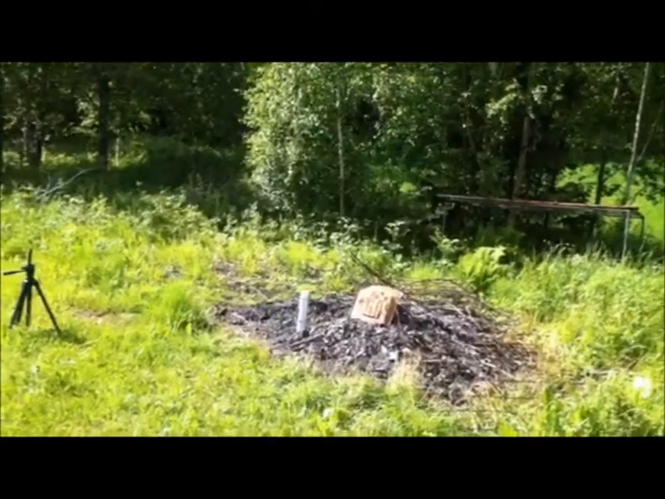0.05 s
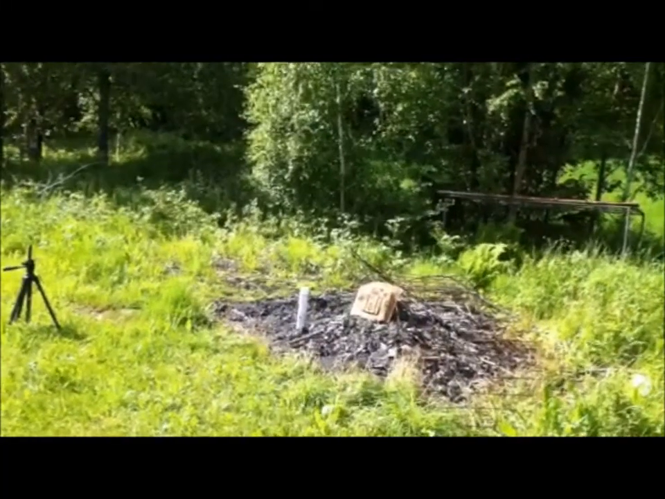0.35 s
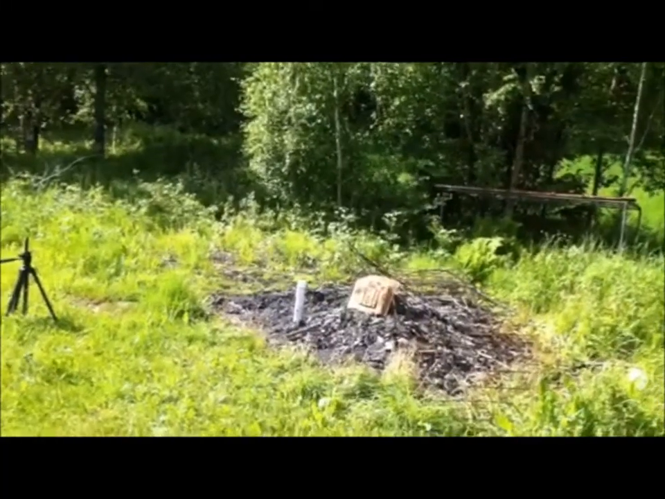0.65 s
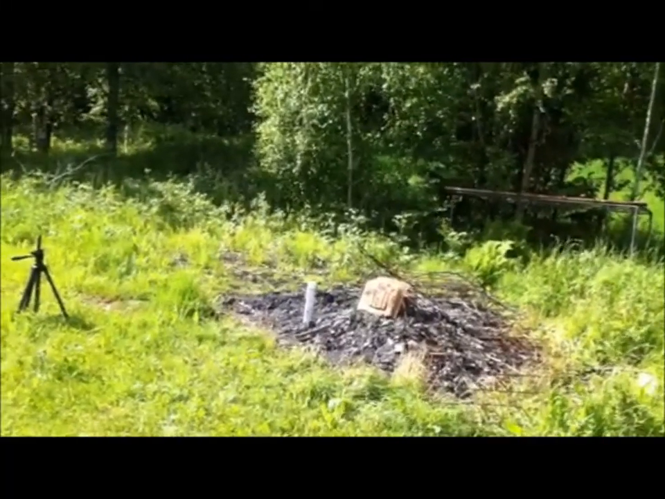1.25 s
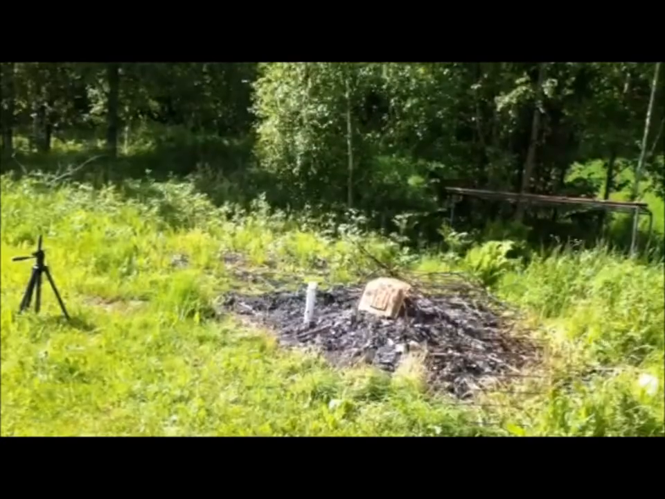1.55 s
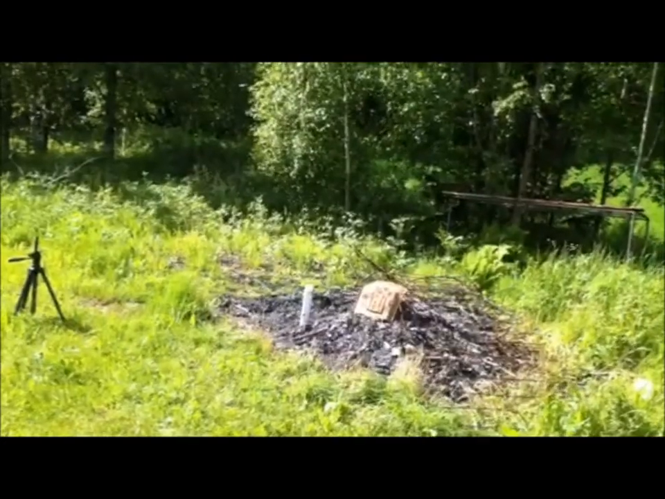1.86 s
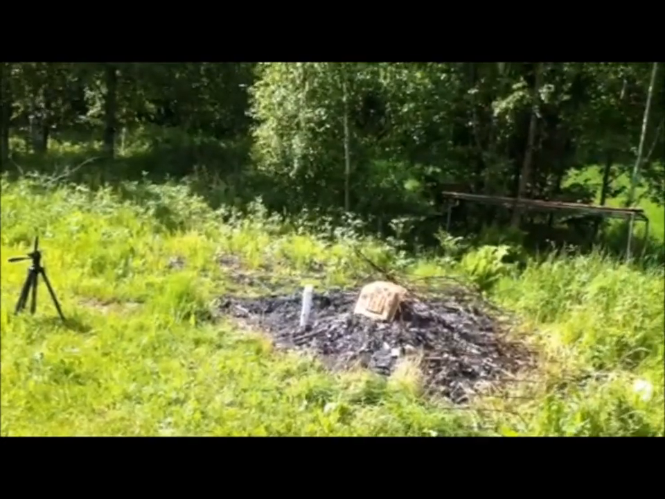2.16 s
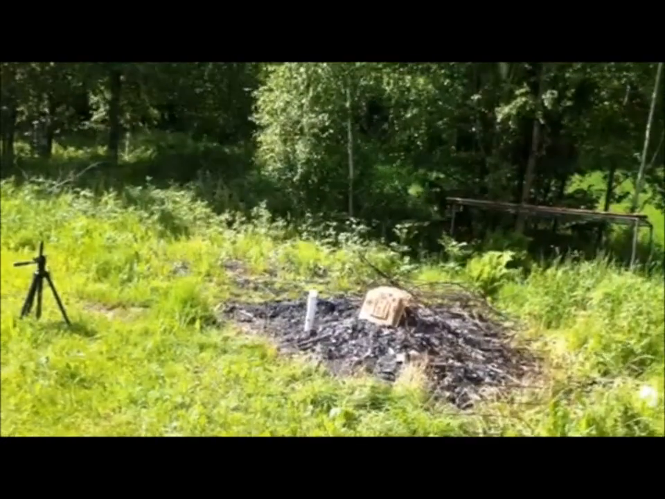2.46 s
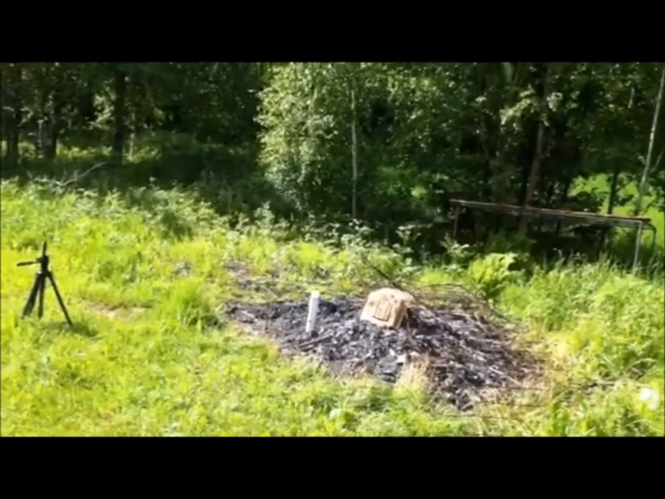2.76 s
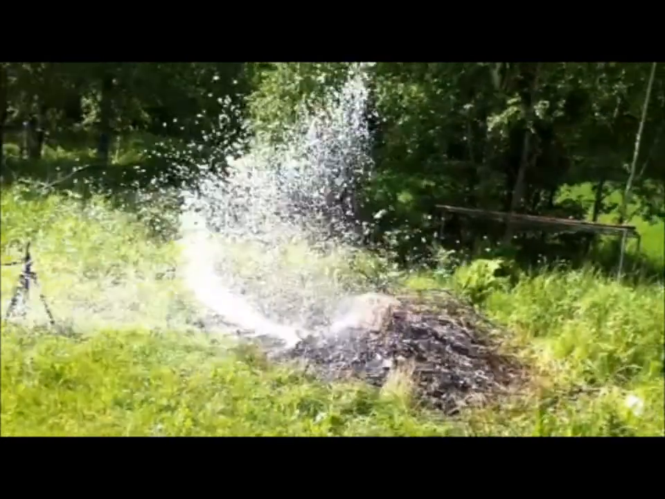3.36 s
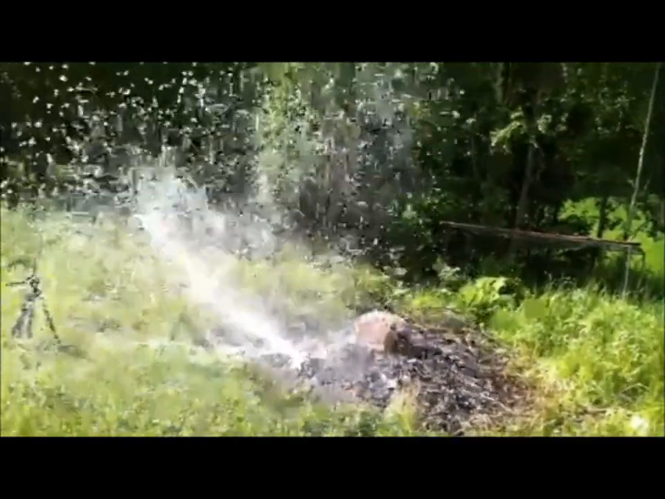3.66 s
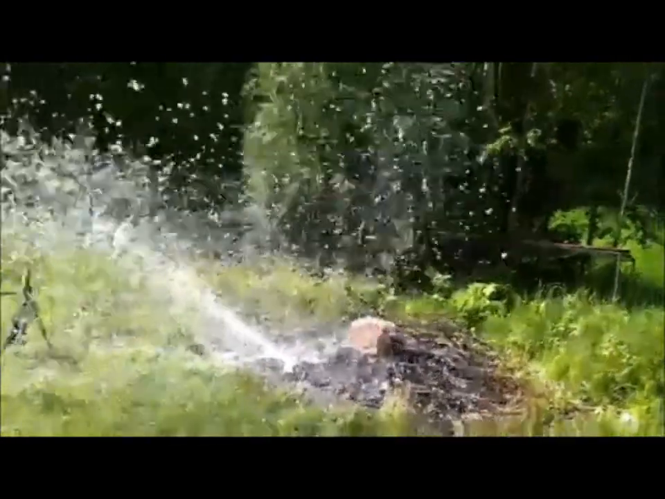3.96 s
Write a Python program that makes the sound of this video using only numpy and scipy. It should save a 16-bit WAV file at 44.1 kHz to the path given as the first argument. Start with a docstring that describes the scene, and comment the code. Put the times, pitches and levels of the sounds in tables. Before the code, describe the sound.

A pressurized can bursts with a sharp bang several metres away in a clearing. Before it, light wind buffets the microphone over faint rustling; after it come a short echo and a surging, hissing jet of spray.

```python
"""A pressurized can bursts on a fire heap in a clearing, several metres away. Its wall tears with
a 40 ms blast and a few sharp cracks, and the trees scatter the bang back. The contents spurt out,
then open into a surging, hissing jet, coloured by its bounce off the ground. Underneath, a breeze
buffets the microphone over a bed of distant rustle, with two brief hollow hoots."""
import sys
import numpy as np
from scipy import signal
from scipy.fft import rfft, irfft
from scipy.io import wavfile
from scipy.ndimage import uniform_filter1d

SR = 44100
rng = np.random.default_rng(int(sys.argv[2]) if len(sys.argv) > 2 else 0)


def waveform_to_disk(signal):
    """Save audio, clipped to [-1, 1], as 16-bit WAV at the path in sys.argv[1]."""
    frames = np.transpose(np.atleast_2d(signal))
    scaled = np.clip(frames, -1, 1) * 32767
    samples = np.round(scaled).astype(np.int16)
    wavfile.write(sys.argv[1], SR, samples)


N = 176400

# surges of gas as the tear runs on (time [s], hold [s], level [dB])
GAS_SURGES = [(3.0608, 0.0027, -18), (3.0705, 0.0071, -17.5), (3.0816, 0.0035, -22), (3.0938, 0.0023, -21)]
# body of the blast (frequency [Hz], level [dB])
BLAST_EQ = [(60, -25), (240, -15), (400, -1.5), (600, 4), (745, -1), (880, 4.5), (1100, 2.5), (1250, -2),
            (1520, -2.5), (1700, -17), (2000, -1.5), (2950, -0.5), (3950, -6), (5200, 0.5), (8300, -7.5),
            (12900, 0), (15500, -8.5)]
# cracks of the tearing wall (time [s], pressure step [dB], wave length [s], rasp level [dB])
WALL_CRACKS = [(3.0712, -2.5, 0.0004, -13), (3.0727, -3.5, 0.00097, -8.5), (3.0736, -4, .0002, -4.5),
               (3.0749, -15, 0.00012, -8), (3.0762, -7, 0.00059, -25), (3.086, -21, 0.00067, -12),
               (3.0946, 0, 0.00017, -10), (3.097, -13, 0.00055, -27)]
# rasp on each crack (frequency [Hz], level [dB])
RASP_EQ = [(300, -19), (900, 6.5), (1700, -26), (2400, 1), (5000, -4), (8500, 0), (13000, 4.5), (15500, -6)]
# short resonances of the split can (frequency [Hz], width [Hz], gain [dB])
CAN_MODES = [(1047, 117, 2.5), (900, 69, -4), (2420, 880, -6)]
# thin first spray (frequency [Hz], level [dB])
SPURT_EQ = [(880, -54), (1500, -8), (1750, -16), (2240, -15), (2830, -15), (3650, -5.5), (7020, -4.5),
            (11900, 1), (15500, -4)]
# surging of the jet, before the trims (time [s], treble [dB], upper mids [dB], lower mids [dB])
JET_LEVELS = [(3.31, -31, -33.5, -40), (3.324, -25, -28, -36.5), (3.37, -28, -29, -40),
              (3.376, -22.5, -25, -36), (3.428, -30.5, -33.5, -43.5), (3.47, -24, -25, -37),
              (3.52, -25, -31, -42), (3.564, -22, -28, -36.5), (3.624, -20.5, -27.5, -38.5),
              (3.692, -29, -30.5, -39), (3.85, -26, -30.5, -40.5), (3.862, -24.5, -28.5, -42.5),
              (3.92, -29, -31, -38), (3.966, -28.5, -28, -41), (4.0, -25, -30.5, -36)]
# edges of those three bands, top down (frequency [Hz])
JET_BAND_EDGES = [16000, 7500, 3300, 100]
# trim on each band, top down (gain [dB])
JET_BAND_TRIMS = [0.67, 0, -0.87]
# hiss within the bands (frequency [Hz], level [dB])
JET_EQ = [(59, -69), (100, -24.5), (259, -13), (413, -19), (459, -11), (731, -15), (1020, -10),
          (1320, -13.5), (1560, -9), (1740, -9), (2830, -9), (4700, 0), (6460, -2.5), (13300, -0.5),
          (15700, -9)]
# cough as the jet opens (frequency [Hz], level [dB])
COUGH_EQ = [(300, -35), (1500, -15), (2600, 2.5), (3600, 3), (4800, 7.5), (6500, -13), (14000, -25)]
# echo tail from the trees (frequency [Hz], level [dB])
ECHO_EQ = [(35, -75), (60, -45), (156, -16.5), (351, 2.5), (464, -8), (642, 0), (2150, -5), (2840, -2.5),
           (4120, -7), (11700, -3), (15500, -10)]
# wind pressure on the microphone (time [s], level [dB])
WIND_PRESSURE = [(0, -53), (.28, -56.5), (.5, -53), (.68, -58), (.75, -61), (.88, -49.5), (1.05, -58),
                 (1.38, -53), (1.47, -42), (1.56, -56), (1.68, -46.5), (1.82, -43), (1.94, -49),
                 (2.07, -42), (2.2, -53.5), (2.36, -55), (2.46, -49), (2.75, -43), (2.89, -51.5),
                 (3.04, -60.5), (4, -64.5)]
# low rumble of the wind (frequency [Hz], level [dB])
WIND_EQ = [(25, -43), (45, -33), (70, -12.5), (100, -4.5), (135, -0.5), (170, -2.5), (240, -9), (330, -18),
           (500, -39), (1200, -63)]
# brighter rasp of hard buffets (frequency [Hz], level [dB])
BUFFET_EQ = [(150, -17), (270, -9), (340, 4), (450, -4), (800, -17), (1500, -20), (5000, -50)]
# single eddies thumping the microphone (time [s], peak level [dB], pitch [Hz])
EDDY_THUMPS = [(0.351, -36, 138), (0.431, -42, 139), (0.501, -35.5, 122), (.657, -33.5, 141),
               (0.894, -40, 130), (.946, -38, 150), (1.141, -39, 146), (1.198, -41, 170),
               (1.44, -30.5, 180), (1.483, -26, 158), (1.605, -27.5, 147), (1.661, -29, 150),
               (1.711, -26, 155), (1.755, -31, 171), (1.8, -29, 167), (2.035, -23, 165), (2.053, -22, 145),
               (2.115, -26, 143), (2.44, -32.5, 150), (2.511, -35, 148), (2.573, -32.5, 179),
               (2.628, -26.5, 155), (2.676, -20.5, 245), (2.684, -18.5, 171), (2.749, -28, 190),
               (2.766, -22.5, 203), (2.783, -27, 256), (2.844, -43, 142), (2.962, -30, 153)]
# hollow hoots (time [s], peak level [dB])
HOOT_CUES = [(2.794, -33), (3.996, -37)]
# breath leading into each hoot (frequency [Hz], level [dB])
BREATH_EQ = [(200, -5), (450, 8), (850, -9), (1200, -19), (3000, -38)]
# tone of the distant rustle and hiss (frequency [Hz], level [dB])
BED_EQ = [(210, -11), (350, -2.5), (631, -1.5), (683, -3.5), (1170, -6), (1380, -9), (1510, -9),
          (2020, -10), (9290, -15.5), (15700, -21)]
# slow swell of that bed (time [s], level [dB])
BED_LEVEL = [(0, -52.5), (1, -54), (2, -55.5), (3, -54), (4, -50)]

TEAR_ATTACK_S, TEAR_RELEASE_S, TEAR_ROUGH_DB, TEAR_ROUGH_HZ = 0.0006, 0.011, 2.5, 390
RASP_DECAY_S, CRACK_LOW_HZ, CRACK_TOP_HZ, CRACK_DRY_DB = 0.00051, 380, 9000, -4
SPURT_S, SPURT_DB, SPURT_T60_S = 3.209, -26, 0.92
JET_OPENS_S, JET_ATTACK_S, COUGH_DB, COUGH_T60_S = 3.304, 0.0037, -25.5, 0.26
FLUTTER_DB, FLUTTER_HZ, SPATTER_DB, SPATTER_HZ = -0.67, 60, 0.65, 1100
GROUND_LAG_S, GROUND_GAIN, GROUND_TOP_HZ = 0.0019, 0.19, 4500
SCATTER_DB, SCATTER_T60_S = -11.5, 0.15
ECHO_START_S, ECHO_RISE_S = 3.0615, 0.028
NEAR_DB, NEAR_T60_S, FAR_DB, FAR_T60_S = -29, 0.27, -33.5, 0.68
WIND_FLICKER_DB, WIND_FLICKER_HZ = 3.5, 61
EDDY_WIDTH_S, EDDY_SKIRT_DB, EDDY_SKIRT_S = 0.003, -12.5, 0.015
BUFFET_DB, BUFFET_REF_DB = -15.5, -30  # the rasp's share at this wind pressure
HOOT_HZ, HOOT_RISE_HZ_PER_S, HOOT_WIDTH_S, OVERTONE_DB, BREATH_DB = 487, 4000, 0.0088, -28, -8
DROPOUT_FROM_S, DROPOUT_TO_S, CLIP_LEVEL, TOP_HZ = 3.049, 3.058, 0.72, 15740


def burst():
    """Gas rips through the wall in ragged surges; each crack is an N-shaped pressure wave with a rasp."""
    t = times()
    power, cracks, rasp = np.zeros((3, N))
    for start, hold, db in GAS_SURGES:
        release = np.exp(-np.maximum(t - start - hold, 0) / TEAR_RELEASE_S)
        power += (undb(db) * fade_in(start, TEAR_ATTACK_S) * release) ** 2
    roughness = undb(TEAR_ROUGH_DB * wander(TEAR_ROUGH_HZ))
    blast = np.sqrt(power) * roughness * noise(BLAST_EQ)
    for start, step_db, length, rasp_db in WALL_CRACKS:
        age = t - start
        cracks += undb(step_db) * (1 - 2 * age / length) * (age >= 0) * (age < length)
        rasp += undb(rasp_db) * np.exp(-np.abs(age) / RASP_DECAY_S) * (age >= 0)
    cracks = pass_filter(cracks, CRACK_LOW_HZ, "high", order=3)
    cracks = pass_filter(cracks, CRACK_TOP_HZ, "low")
    return blast + can_ring(cracks) + rasp * noise(RASP_EQ)


def can_ring(cracks):
    """The split can rings briefly and lends the cracks a hollow tone."""
    ring = sum(undb(db) * signal.lfilter(*signal.iirpeak(hz, hz / width, fs=SR), cracks)
               for hz, width, db in CAN_MODES)
    return undb(CRACK_DRY_DB) * cracks + ring


def spurt():
    """A first thin spray escapes and soon chokes."""
    envelope = fade_in(SPURT_S, JET_ATTACK_S) * fade_out(SPURT_S, SPURT_T60_S)
    return undb(SPURT_DB) * noise(SPURT_EQ, lo_hz=300) * envelope


def jet():
    """The full jet coughs open, then hisses, surges and spatters."""
    hiss = np.zeros(N)
    for k, trim_db in enumerate(JET_BAND_TRIMS):
        level = undb(automation(JET_LEVELS, column=k + 1) + trim_db)
        hiss += level * noise(JET_EQ, lo_hz=JET_BAND_EDGES[k + 1], hi_hz=JET_BAND_EDGES[k])
    cough = undb(COUGH_DB) * noise(COUGH_EQ) * fade_out(JET_OPENS_S, COUGH_T60_S)
    texture = undb(FLUTTER_DB * wander(FLUTTER_HZ) + SPATTER_DB * wander(SPATTER_HZ))
    return fade_in(JET_OPENS_S, JET_ATTACK_S) * texture * (hiss + cough)


def with_reflections(direct):
    """The ground adds a late, duller copy of the jet, and the sticks of the heap scatter it."""
    dulled = pass_filter(direct, GROUND_TOP_HZ, "low", order=1)
    bounce = np.interp(times() - GROUND_LAG_S, times(), dulled)
    paths = rng.standard_normal(N) * fade_out(0, SCATTER_T60_S)
    scattered = signal.fftconvolve(direct, paths / np.linalg.norm(paths))[:N]
    return direct + GROUND_GAIN * bounce + undb(SCATTER_DB) * scattered


def tree_echo():
    """The bang's noisy tail: short from the undergrowth, fainter and longer from the trees behind."""
    peak_s = ECHO_START_S + ECHO_RISE_S
    near = undb(NEAR_DB) * fade_out(peak_s, NEAR_T60_S)
    far = undb(FAR_DB) * fade_out(peak_s, FAR_T60_S)
    return noise(ECHO_EQ) * fade_in(ECHO_START_S, ECHO_RISE_S) * (near + far)


def wind():
    """Low flutter on the microphone, with eddies thumping out of it; harder buffets are brighter."""
    pressure = undb(automation(WIND_PRESSURE) + WIND_FLICKER_DB * wander(WIND_FLICKER_HZ))
    thumps = np.zeros(N)
    for at, db, hz in EDDY_THUMPS:
        age = times() - at
        swell = np.exp(1 - np.hypot(1, age / EDDY_WIDTH_S))
        thumps += undb(db) * swell * np.cos(2 * np.pi * (hz * age + rng.random()))
        skirt = undb(db + EDDY_SKIRT_DB) * np.exp(-np.abs(age) / EDDY_SKIRT_S)
        pressure = np.hypot(pressure, skirt)  # the rumble lifts around each thump
    drive = np.minimum(pressure / undb(BUFFET_REF_DB), 2)
    rasp = undb(BUFFET_DB) * drive * noise(BUFFET_EQ)
    return pass_filter(thumps, 71, "high") + pressure * (noise(WIND_EQ) + rasp)


def hoots():
    """Each hoot starts breathy and slides up into a short tone, like air across a small opening."""
    air, out = noise(BREATH_EQ), np.zeros(N)
    for at, db in HOOT_CUES:
        age = times() - at
        phase = 2 * np.pi * (HOOT_HZ + HOOT_RISE_HZ_PER_S * age / 2) * age
        tone = np.sin(phase) + undb(OVERTONE_DB) * np.sin(2 * phase)
        swell = np.exp(-.5 * (age / HOOT_WIDTH_S) ** 2)
        breath = undb(BREATH_DB) * air * np.exp(-.5 * (age / HOOT_WIDTH_S + 1) ** 2)
        out += undb(db) * (tone * swell + breath)
    return out


def clearing():
    """A smooth bed of distant rustle and hiss."""
    bed = pass_filter(noise(BED_EQ), 87, "high")
    return bed * undb(automation(BED_LEVEL) + 0.15 * wander(rate_hz=3))


def undb(db):
    """Decibels to gain."""
    return 10 ** (np.asarray(db) / 20)


def times():
    """Time of every sample, in seconds."""
    return np.arange(N) / SR


def automation(table, column=1):
    """One column of a table, ramped from point to point in time."""
    rows = np.array(table)
    return np.interp(times(), rows[:, 0], rows[:, column])


def noise(eq, lo_hz=0, hi_hz=SR / 2):
    """White noise shaped by an EQ curve, band-limited and brought to rms 1."""
    hz = np.maximum(np.arange(N // 2 + 1) * SR / N, 1)
    rows = np.array(eq)
    gain = undb(np.interp(np.log(hz), np.log(rows[:, 0]), rows[:, 1]))
    in_band = (hz > lo_hz) & (hz <= hi_hz)
    x = irfft(rfft(rng.standard_normal(N)) * gain * in_band, N)
    return x / np.std(x)


def wander(rate_hz):
    """Smooth random modulation with a spread of 1."""
    window = max(int(SR / rate_hz), 1)
    x = uniform_filter1d(rng.standard_normal(N), window)
    x = uniform_filter1d(x, window)
    return x / np.std(x)


def pass_filter(x, hz, kind, order=2):
    """Gentle low-pass or high-pass."""
    return signal.sosfilt(signal.butter(order, hz, kind, fs=SR, output="sos"), x)


def fade_in(start, attack):
    """Ramps from 0 to 1 over the attack."""
    return np.clip((times() - start) / attack, 0, 1)


def fade_out(start, t60):
    """Holds at 1 until the start, then falls 60 dB every t60 seconds."""
    return np.exp(-np.log(1000) * np.maximum(times() - start, 0) / t60)


def scene():
    """All layers meet at one microphone, the same in both ears."""
    mono = burst() + tree_echo() + spurt() + with_reflections(jet()) + wind() + hoots() + clearing()
    return np.array([mono, mono])


def record(dry):
    """An instant's dropout precedes the burst; the hardest cracks clip the microphone; the top is cut."""
    t = times()
    live = (t < DROPOUT_FROM_S) | (t > DROPOUT_TO_S)
    clipped = np.clip(dry * live, -CLIP_LEVEL, CLIP_LEVEL)
    high_cut = signal.ellip(10, .1, 80, TOP_HZ, fs=SR, output="sos")
    return signal.sosfilt(high_cut, clipped)


dry = scene()
out = record(dry)
waveform_to_disk(out)
```